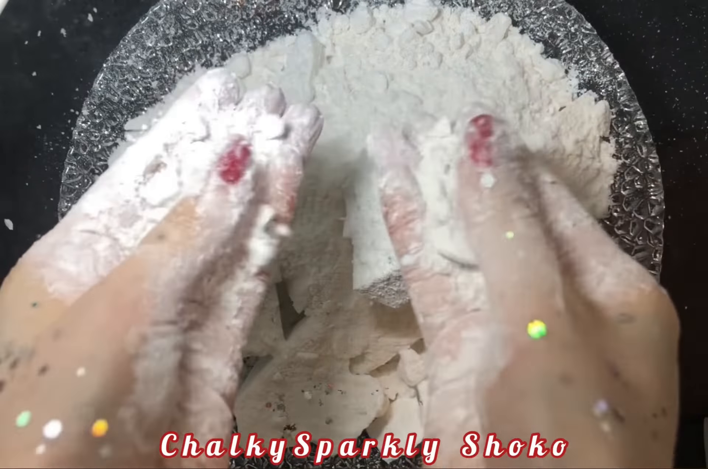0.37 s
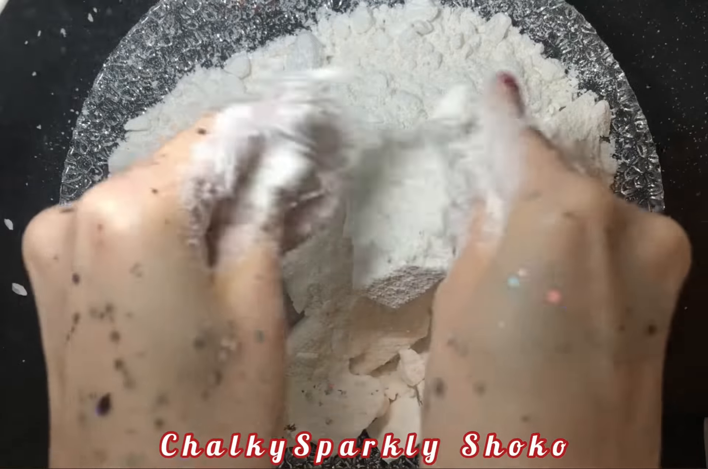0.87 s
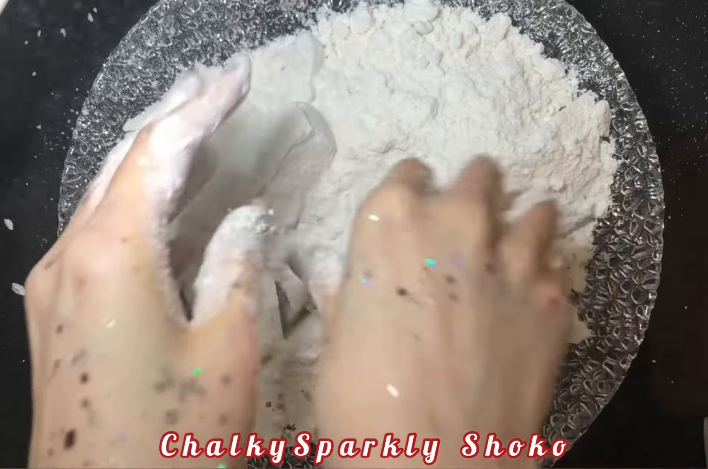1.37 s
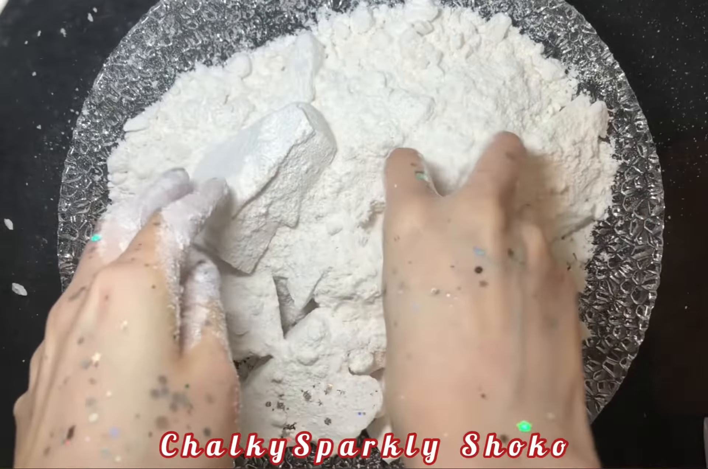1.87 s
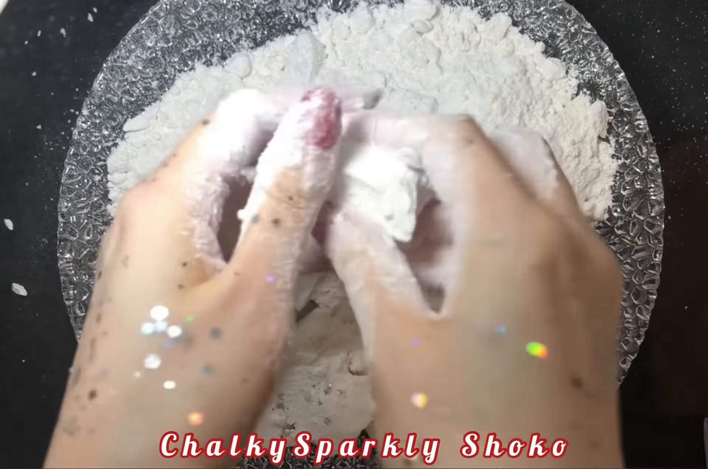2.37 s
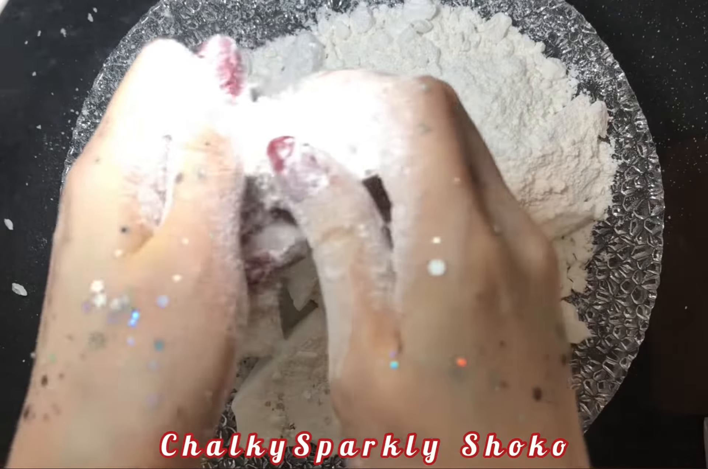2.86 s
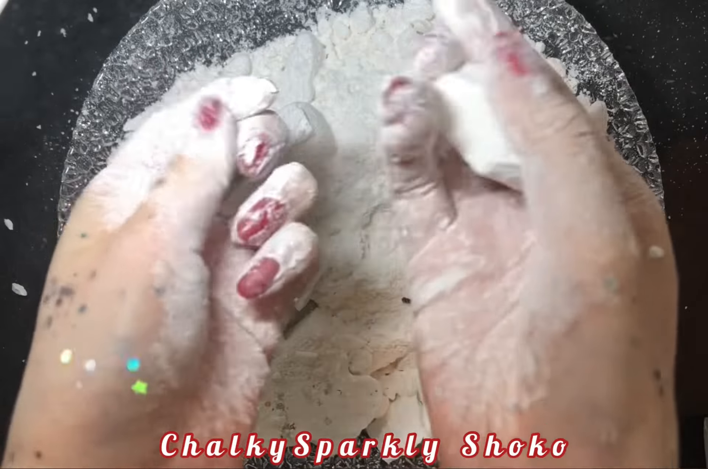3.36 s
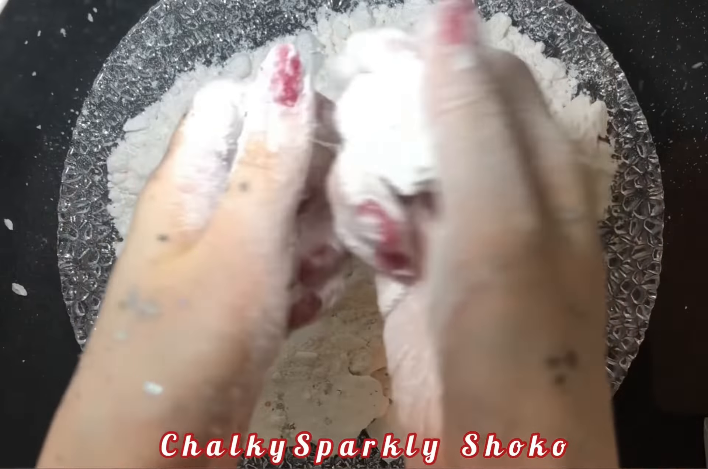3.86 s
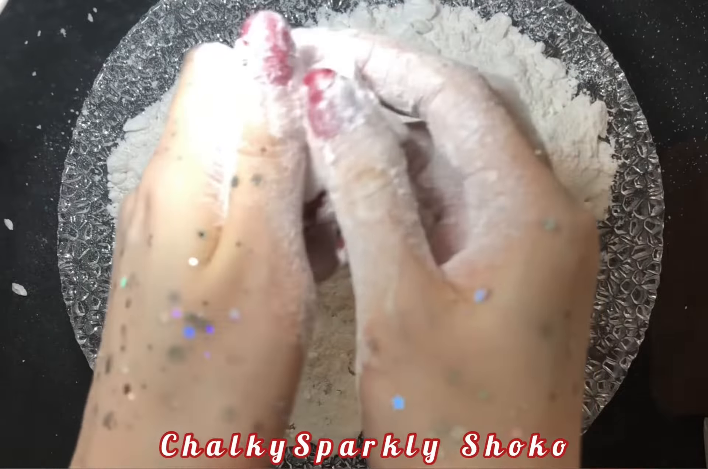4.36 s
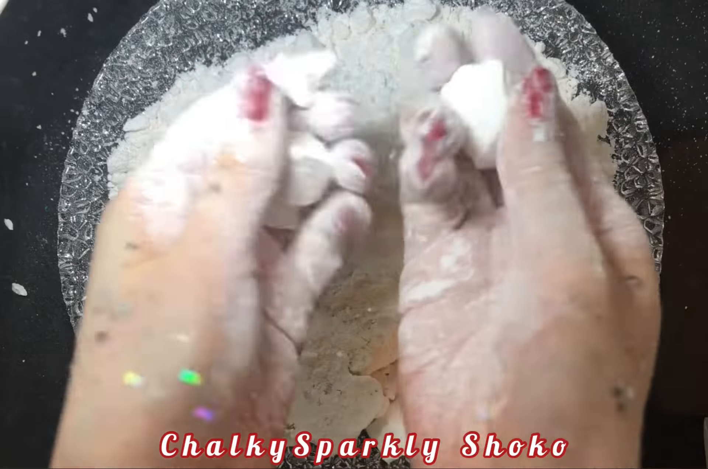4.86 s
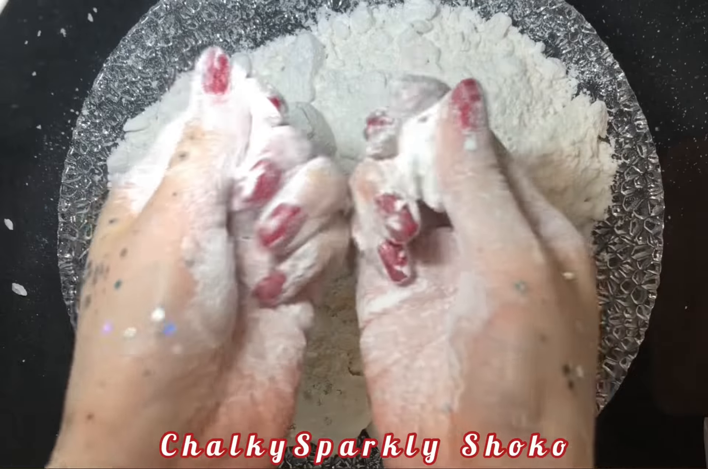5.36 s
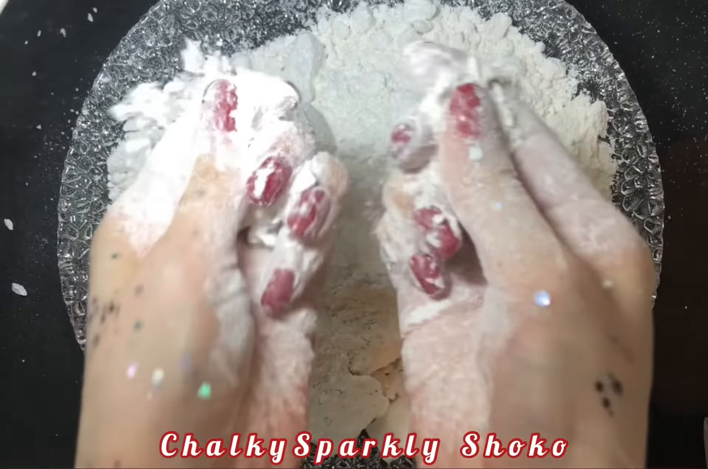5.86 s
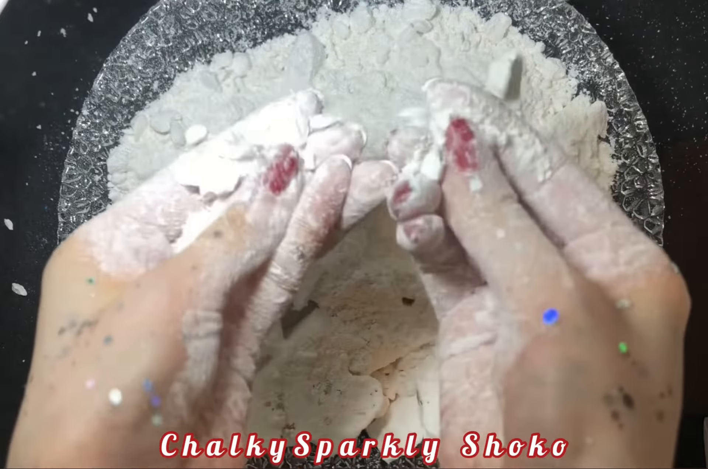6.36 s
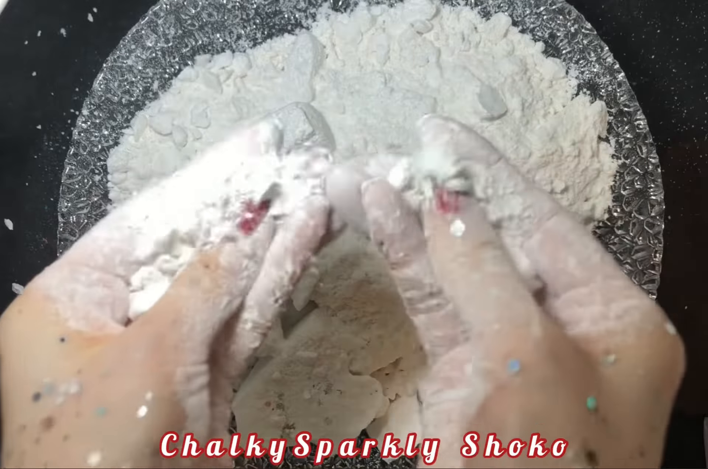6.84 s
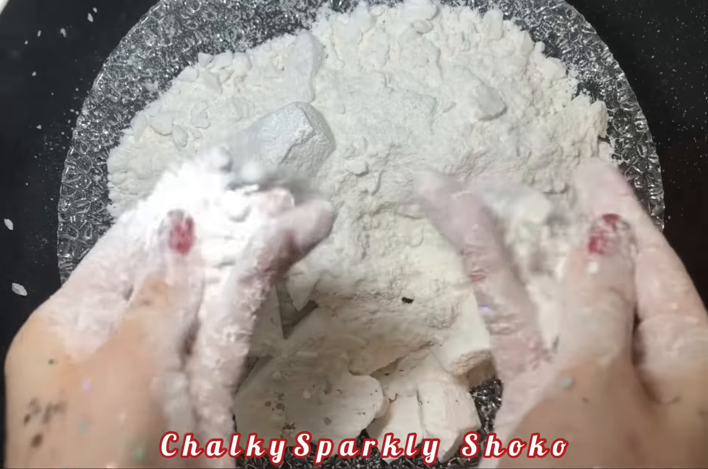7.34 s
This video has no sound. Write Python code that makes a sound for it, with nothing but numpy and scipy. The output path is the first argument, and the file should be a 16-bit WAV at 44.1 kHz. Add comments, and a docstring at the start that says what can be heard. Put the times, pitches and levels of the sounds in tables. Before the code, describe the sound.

Very close, dry hands rub powder and lumps of chalk over a glass bowl. Coarse gritty strokes and small cracks come first, with soft thuds as pieces drop into powder. A brief creak leads to a sharp snap, then finer, silkier hissing. A loud break at mid-length starts a run of hard cracks and crunchy crumbling, easing to rubbing and one last snap. A low appliance hum stays steady in a quiet room.

```python
"""Chalk crushed over a bowl

Hands close by rub, squeeze and snap lumps of chalk. Powder hisses as dense noise grains with crunching crumbs;
lumps crack as struck resonances, one creaks by stick-slip, pieces thud as damped modes and crumbs tap glass.
An appliance hums in steady sines, the table rumbles and the room hisses in filtered noise,
and a low drone swells far off as a gliding tone."""
import sys
import numpy as np
from scipy import signal
from scipy.fft import rfft, irfft
from scipy.io import wavfile

SR = 44100
rng = np.random.default_rng(int(sys.argv[2]) if len(sys.argv) > 2 else 0)


def unload_audio(sound):
    """Save the sound as a 16-bit wav file, at the path given as the first command line argument."""
    columns = np.transpose(np.atleast_2d(sound))
    # keep every value between -1 and 1, then stretch to whole-number steps
    steps = np.round(np.clip(columns, -1, 1) * 32767)
    wavfile.write(sys.argv[1], SR, steps.astype(np.int16))


def invert_db(x):
    """Field ratio 10**(x/20) for x, a level in decibels (scalar or array-like)."""
    u = np.asarray(x, float) / 20
    return 10 ** u


N = 340452   # samples


def rms_one(x):
    """Normalisation: a signal scaled to unit rms."""
    return x / np.sqrt(np.mean(x ** 2) + 1e-20)


def in_time(rows):
    """Linear interpolation: every column of a curve, sample by sample."""
    s, *columns = np.transpose(rows)
    return [np.interp(np.arange(N) / SR, s, column) for column in columns]


def drift(rate_hz):
    """Low-pass noise: slow random fluctuation of unit rms from a double real pole."""
    r = np.exp(-40 * np.pi * rate_hz / SR)   # computed at every 20th sample
    noise = rng.standard_normal(N // 20 + 4002)
    slow = signal.lfilter([1], [1, -2 * r, r * r], noise)[4000:]   # without the onset
    return np.interp(np.arange(N) / 20, np.arange(len(slow)), rms_one(slow))


def colour(x, spectrum):
    """Spectral shaping: weights the Fourier components by a curve of f/Hz, level/dB."""
    hz, db = np.transpose(spectrum)
    grid = np.maximum(np.arange(N // 2 + 1) * SR / N, 1)
    gain = invert_db(np.interp(np.log(grid), np.log(hz), db))
    return irfft(rfft(x) * gain, N)


def band(x, low_hz, high_hz):
    """Butterworth band-pass: passes one band with a maximally flat response."""
    return signal.sosfilt(signal.butter(2, [low_hz, high_hz], "band", fs=SR, output="sos"), x)


def resonance(x, hz, width_hz):
    """Damped oscillator: a pole pair whose radius sets the bandwidth, with unit gain on top."""
    r = np.exp(-np.pi * width_hz / SR)
    poles = [1, -2 * r * np.cos(2 * np.pi * hz / SR), r * r]
    return signal.lfilter([(1 - r * r) / 2, 0, (r * r - 1) / 2], poles, x)


def add(out, s, sound, peak_db):
    """Superposition: lays a short sound at time s with the given peak."""
    i = round(s * SR)
    out[i:i + len(sound)] += (sound * invert_db(peak_db) / np.abs(sound).max())[:N - i]


def gestures(rows, rise_db_per_s, fall_db_per_s):
    """Exponential envelopes: power of each gesture at every 64th sample, through rise, hold and fall."""
    t = np.arange(N // 64 + 2) * 64 / SR
    s, held, db = np.transpose(rows)[:3, :, None]
    rise = rise_db_per_s * np.maximum(s - t, 0)
    fall = fall_db_per_s * np.maximum(t - s - held, 0)
    return invert_db(2 * (db - rise - fall))


def every_sample(coarse):
    """Linear interpolation from every 64th sample to all."""
    return np.interp(np.arange(N) / 64, np.arange(len(coarse)), coarse)


def rubbing():
    """Power addition: strokes sum to the hiss level; the strongest stroke dominates the fineness."""
    # strokes of powder between the palms:
    # [start t/s, held/s, level before the fineness correction/dB, fineness of the grains/dB]
    stroke_rows = [(0.025, 0.128, -47, -2.5), (0.21, 0.144, -51.8, 0.2), (0.49, 0.055, -46.5, -1.7),
                   (0.6, 0.048, -44.2, 0.6), (0.662, 0.099, -48.2, 0.7), (0.804, 0.098, -48.1, -0.4),
                   (0.91, 0.05, -42.5, 1.7), (1.039, 0.093, -42.0, 2.2), (1.479, 0.049, -49.5, -3.1),
                   (1.554, 0.18, -53.8, -1.7), (1.777, 0.072, -53.4, -0.8), (1.94, 0.022, -50, 4.5),
                   (2.126, 0.078, -49.6, 6.7), (2.272, 0.17, -48, 6.3), (2.762, 0.012, -37, 0.0),
                   (2.885, 0.07, -51, -0.7), (2.979, 0.032, -43.9, 6.1), (3.071, 0.005, -41.7, 8.4),
                   (3.163, 0.015, -45, 7.6), (3.291, 0.036, -41.2, 14.2), (3.366, 0.069, -44.5, 9.6),
                   (3.494, 0.016, -42.1, 7.5), (3.585, 0.09, -49.5, 5.4), (3.716, 0.014, -43.5, 5.4),
                   (3.859, 0.135, -49.5, 9.6), (4.017, 0.027, -47.5, 9.9), (4.096, 0.036, -42.9, 11.9),
                   (4.199, 0.033, -40.8, 9.0), (4.625, 0.171, -47.1, 5.6), (4.865, 0.045, -46, 0.0),
                   (4.965, 0.05, -49, -1.0), (5.05, 0.07, -41, -3.0), (5.221, 0.033, -44.5, 5.0),
                   (5.375, 0.15, -46.3, 1.3), (5.58, 0.085, -44.5, -2.0), (5.7, 0.125, -45, -3.5),
                   (5.924, 0.103, -46.5, -3.0), (6.115, 0.058, -45, 0.6), (6.178, 0.19, -45.5, -0.3),
                   (6.448, 0.179, -51.7, -2.4), (6.603, 0.097, -47.7, -0.6), (6.732, 0.017, -40, -1.6),
                   (6.797, 0.052, -46.6, -0.6), (6.982, 0.048, -46.0, -2.0), (7.2, 0.1, -48.5, -0.6),
                   (7.296, 0.087, -46.2, -3.0), (7.42, 0.156, -49, -1.3)]
    resting_db = -63
    power = gestures(stroke_rows, rise_db_per_s=550, fall_db_per_s=350)
    total = power.sum(axis=0) + invert_db(2 * resting_db)
    fine = every_sample(np.transpose(stroke_rows)[3] @ power / total)
    # finer grains: more dust, less grit and hiss
    hiss_db = every_sample(10 * np.log10(total)) - 0.3 * fine
    dust_db = -2 + 1.15 * fine
    grit_db = -1.5 - 0.7 * fine
    return hiss_db, dust_db, grit_db


def powder():
    """Granular noise: dense impulses of random size share each stroke, while each band swells on its own."""
    # spectrum of the grains: [f/Hz, relative level/dB]
    grain_spectrum = [(500, 7.5), (2000, 2.5), (7500, 3), (16000, -7)]
    grains_per_s = 14000
    hiss_db, dust_db, grit_db = rubbing()
    sizes = invert_db(1.1 * np.minimum(rng.exponential(1, (2, N)), 6)) * rng.standard_normal((2, N))
    grains = colour(sizes * (rng.random((2, N)) < grains_per_s / SR), grain_spectrum)
    grains /= np.std(band(grains, 2700, 21000))
    out = 0
    edges = np.geomspace(450, 16500, num=30)
    for k, (low_hz, high_hz) in enumerate(zip(edges, edges[1:])):
        octave = np.log2(low_hz)
        grit_share = np.interp(octave, [10.5, 12.2], [1, 0])   # coarse grains: low bands
        dust_share = np.interp(octave, [12.6, 13.5], [0, 1])   # fine grains: high bands
        size_db = grit_share * grit_db + dust_share * dust_db
        # neighbouring bands get unrelated grains
        out = out + band(grains[k % 2], low_hz, high_hz) * invert_db(size_db + 3.2 * drift(6))
    return invert_db(hiss_db + 1.7 * drift(50)) * out


def crumbs():
    """Random bursts through broad resonances: coarse bits crunch, louder as the powder is worked hard."""
    crumbs_per_s = 90
    hiss_db, _, grit_db = rubbing()
    born = rng.random(N) < crumbs_per_s / SR
    sizes = invert_db(hiss_db + grit_db + 14 + 3 * np.minimum(rng.exponential(1, N), 3))
    dealt = rng.integers(0, 5, N)   # the resonance that each crumb excites
    grit = rng.standard_normal(N)
    out = np.zeros(N)
    for k, hz in enumerate(np.geomspace(900, 5000, num=5)):
        envelope = signal.lfilter([1], [1, -.96], born * sizes * (dealt == k) + 1e-18)
        out += resonance(envelope * grit, hz, 1.3 * hz)
    return out


def cracks():
    """Impulse excitation: a break and dying after-slips ring the lump, spray splinters and shake the bowl."""
    # lumps cracking: [t/s, peak level/dB, ring f/Hz, peak of the splinter spray over the ring/dB]
    crack_rows = [(0.5514, -25.5, 2750, -1), (0.61, -25, 1400, 4), (0.7595, -15, 1790, 12),
                  (0.9245, -25, 1200, 6), (0.9288, -14, 1190, 9), (0.9603, -15.5, 3240, 6),
                  (0.9797, -21.5, 1180, 3), (0.9935, -27, 1100, 6), (1.1395, -23, 1340, 6),
                  (1.146, -24, 2000, 10), (1.2074, -20, 3460, 12), (1.336, -26, 3620, 3),
                  (1.7305, -26, 1800, -6), (2.7256, -11, 2750, 14), (2.7391, -15, 2000, 12),
                  (2.7504, -15, 2850, 8), (2.7546, -4.5, 2800, 16), (2.7585, -11, 6700, 0),
                  (2.9711, -15.5, 1880, 8), (3.0744, -22, 6630, 17), (4.4982, 1, 1200, 0),
                  (4.4996, -3, 1900, 6), (4.4992, -7, 8000, 0), (4.579, -27, 2800, -2),
                  (4.8568, -1, 3200, 8), (4.876, -16, 3070, 0), (4.9186, -21.5, 2880, -2),
                  (4.951, -28, 4500, 8), (4.9556, -9, 2850, -4), (5.0075, -27, 5500, 6),
                  (5.013, -20.5, 2930, 3), (5.0476, -1, 2180, 5), (5.0802, 2, 6200, -3),
                  (5.0826, -3, 2300, -2), (5.0935, -20, 6000, 4), (5.1005, -6, 2810, -3.5),
                  (5.1165, -21, 1960, -4), (5.2222, -15, 3000, 11), (5.2278, -14, 4000, 6),
                  (5.622, -21, 3340, 8), (5.6484, -16.5, 5500, 4), (5.659, -21, 2400, 3),
                  (5.695, -19, 2500, 6), (5.7415, -18, 1900, 4), (5.7487, -12, 2600, 8),
                  (5.7549, -6, 1360, 9), (5.7585, -7, 3000, 6), (5.825, -24, 5000, 0),
                  (5.851, -23, 1400, 9), (5.866, -23, 1300, 3), (5.888, -20.5, 1900, 8),
                  (5.907, -25, 2000, 9), (5.921, -23, 1440, 8), (5.929, -25, 4500, 6),
                  (5.9445, -14, 1210, 15), (6.0192, -13.5, 1800, 9), (6.03, -17, 7950, 3),
                  (6.113, -19.5, 1400, 14), (6.2896, -23, 1150, 9), (6.334, -22, 3300, 3),
                  (6.3685, -18, 2800, 3), (6.4178, -19, 1440, 10), (6.453, -17, 1400, 17),
                  (6.602, -21.5, 4000, 7), (6.691, -19, 1870, 9), (6.979, -16, 6300, -18),
                  (7.3033, -1.5, 3840, -8), (7.3163, -15, 3160, 3)]
    out = np.zeros(N)
    t = np.arange(SR // 10) / SR
    noises = rng.standard_normal((len(crack_rows), 2, len(t)))
    for (s, peak_db, hz, spray_db), noise in zip(crack_rows, noises):
        tear_t60_s = .024 * invert_db(0.067 * peak_db)   # stronger breaks tear for longer
        slips = noise[0] * invert_db(-60 * t / tear_t60_s)
        slips[0] = 10.0   # the break itself
        ring = resonance(resonance(slips, hz, 0.66 * hz), hz, 0.66 * hz)
        ring = ring + 0.6 * resonance(slips, hz, 0.08 * hz)   # the lump sings on briefly
        spray = band(slips, 0.15 * hz, min(4.15 * hz, 12500))   # small lumps spray finer
        tail = band(band(noise[1], 360, 2540), 360, 2540) * invert_db(-18 - 60 * t / 0.16)
        tail = tail * 1500 / hz   # big lumps shake the bowl most
        spray = invert_db(spray_db) * spray / np.abs(spray).max()
        add(out, s, ring / np.abs(ring).max() + spray + tail, peak_db)
    return out


def creak():
    """Stick-slip friction: a nearly even click train drives the lump's resonances, brighter when strong."""
    # a lump under load: [t/s, slip rate f/Hz, relative slip level/dB]
    load_rows = [(2.597, 250, -33), (2.645, 240, -30), (2.662, 310, -28.5), (2.678, 460, -27),
                 (2.69, 400, -27.5), (2.708, 180, -28.5)]
    # resonances of the lump: [f/Hz, width/Hz, relative level/dB]
    lump_modes = [(950, 500, 5), (1750, 400, 5.5), (2750, 400, 2), (3700, 500, 3), (5000, 700, -2),
                  (7300, 900, 1)]
    per_s, slip_db = in_time(load_rows)
    t = np.arange(N) / SR
    loaded = (t > load_rows[0][0]) & (t < load_rows[-1][0])
    turns = np.cumsum(per_s * loaded * (1 + .05 * drift(60))) / SR
    # one click whenever the count of turns passes a whole number
    slips = np.diff(np.floor(turns), prepend=0) * invert_db(slip_db + rng.normal(0, 1, N))
    # grit follows each slip
    scrape = signal.lfilter([1], [1, -.988], slips) * rng.standard_normal(N) * 0.085
    weak_db = slip_db - slip_db.max()
    out = np.zeros(N)
    for hz, width_hz, db in lump_modes:
        gain = invert_db(db + 19 + weak_db * hz / 1800)   # weak slips lose treble
        out += gain * resonance(scrape + slips + 1e-18, hz, width_hz)
    return out


def thuds():
    """Damped low mode: a soft push rings it for a few cycles, with a puff of powder."""
    # pieces and knuckles landing in the powder: [t/s, peak level/dB, thud f/Hz]
    thud_rows = [(0.923, -29.5, 320), (0.977, -22.5, 322), (1.069, -27.5, 233), (1.138, -23.5, 493),
                 (1.357, -16, 340), (1.48, -19.5, 430), (1.505, -26, 296), (1.553, -30, 420),
                 (1.716, -27, 400), (1.726, -23, 450), (2.113, -29, 159), (2.753, -14, 330),
                 (2.759, -21, 130), (2.968, -23.5, 437), (4.4962, -7, 510), (5.043, -23, 172),
                 (5.083, -16, 514), (5.7525, -14, 420), (5.94, -24, 567), (6.286, -24.5, 371),
                 (6.415, -24, 400), (7.301, -21, 425), (7.388, -19.5, 355)]
    out = np.zeros(N)
    t = np.arange(SR // 10) / SR
    noises = rng.standard_normal((len(thud_rows), len(t)))
    for (s, peak_db, hz), noise in zip(thud_rows, noises):
        decay = invert_db(-60 * t * hz / 4.5)   # 60 dB in 4.5 cycles
        push = -np.sin(2 * np.pi * hz * t) * decay * (1 - np.exp(-t * hz / .6)) ** 2
        puff = band(noise, .6 * hz, 2.8 * hz) * invert_db(-60 * t / 0.04) * np.minimum(t * hz, 1)
        # a thud sounds just after its listed time
        add(out, s + 0.002, push + invert_db(-4) * puff, peak_db)
    return out


def tinks():
    """Modal excitation: crumbs tap the glass, a gritty touch striking each mode with its own strength."""
    # crumbs tapping: [t/s, peak level/dB]
    tap_rows = [(1.196, -25), (1.797, -28), (1.821, -26)]
    # modes of the glass: [f/Hz, mean relative level/dB, t60/s]
    glass_modes = [(3550, -7, .028), (6350, -6, .022), (10500, 0, .015)]
    out = np.zeros(N)
    t = np.arange(SR // 20) / SR
    noises = rng.standard_normal((len(tap_rows), len(t)))
    strengths = rng.standard_normal((len(tap_rows), len(glass_modes)))
    for (s, peak_db), noise, luck in zip(tap_rows, noises, strengths):
        rings = np.zeros(len(t))
        for (hz, db, t60_s), k in zip(glass_modes, luck):
            rings += invert_db(db + 2 * k - 60 * t / t60_s) * np.sin(2 * np.pi * hz * t)
        grit = band(noise, 3000, 15000) * invert_db(0.5 - 60 * t / .022)
        add(out, s, (rings + grit) * (1 - np.exp(-t / .0007)), peak_db)
    return out


def hum():
    """Additive synthesis: steady motor tones, wavering more in level the higher they lie."""
    # tones of the appliance: [f/Hz, mean rms level/dB]
    motor_tones = [(100.2, -39), (376.6, -57.5), (423.8, -58), (847.3, -53), (900, -61.5)]
    t = np.arange(N) / SR
    out = np.zeros(N)
    for hz, db in motor_tones:
        level = np.sqrt(2) * invert_db(db + 0.003 * hz * drift(2.2))
        out += level * np.sin(2 * np.pi * (hz * t + rng.random()))
    return out


def drone():
    """Frequency glide: the phase integrates a climbing pitch, shared by two weak overtones."""
    # swells of the far drone: [start t/s, length/s, level/dB (the peak is set 4 dB above it)]
    swell_rows = [(5.48, .66, -39), (6.14, .54, -32.5), (7.26, .46, -41)]
    top_hz, climb_hz, climb_s = 62.5, 11, .2   # each swell climbs towards the top pitch
    lateness = 1.4   # exponent; above 1 the swell peaks past its middle
    out = np.zeros(N)
    for s, length, db in swell_rows:
        t = np.arange(round(length * SR)) / SR
        phase = 2 * np.pi * np.cumsum(top_hz - climb_hz * np.exp(-t / climb_s)) / SR
        tone = np.sin(phase) + invert_db(-18) * np.sin(2 * phase) + invert_db(-22) * np.sin(3 * phase)
        add(out, s, tone * np.sin(np.pi * (t / length) ** lateness), db + 4)
    return out


def room():
    """Filtered noise: steady air noise of the room, and table rumble that grows as the hands lean."""
    # spectrum of the air noise: [f/Hz, relative level/dB]
    air_spectrum = [(20, -6), (50, -29), (90, 7.5), (230, -0.5), (700, -9.5), (900, -3.5), (1200, -9.5),
                    (2500, -18), (5000, -27.5), (16000, -27)]
    # hands leaning on the table: [start t/s, held/s, rumble level/dB]
    lean_rows = [(.97, .03, -35), (1.17, .03, -29), (1.38, .02, -29), (1.52, .03, -30), (1.72, .16, -34),
                 (4.49, .03, -35), (6.95, .4, -42)]
    air_db, still_db = -47.5, -47   # rms of the air; rumble without leaning
    air = invert_db(air_db) * rms_one(colour(rng.standard_normal(N), air_spectrum))
    rumble = rms_one(band(rng.standard_normal(N), 11, 59))
    leaning = gestures(lean_rows, rise_db_per_s=170, fall_db_per_s=170).sum(axis=0)
    leaning = leaning + invert_db(2 * still_db)
    return air + every_sample(np.sqrt(leaning)) * rumble


def scene():
    """Superposition of all sources, mono."""
    hands = powder() + crumbs() + cracks() + creak() + thuds() + tinks()
    background = hum() + drone() + room()
    return (hands + background)[None]


def roll_off(x):
    """The treble ends steeply here."""
    return signal.sosfilt(signal.butter(12, 15900, fs=SR, output="sos"), x)


def record(dry):
    """Hard clipping: peaks beyond full scale are cut off."""
    mix = np.clip(dry, -1, 1)
    return roll_off(mix)


dry = scene()
out = record(dry)
unload_audio(out)
```